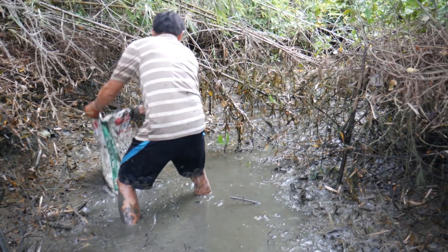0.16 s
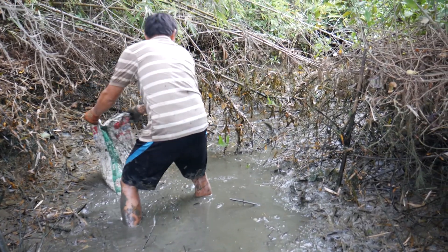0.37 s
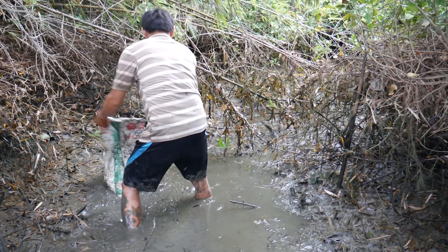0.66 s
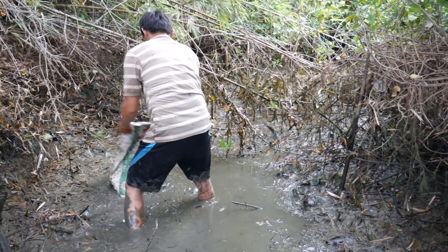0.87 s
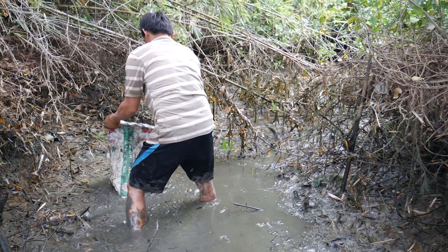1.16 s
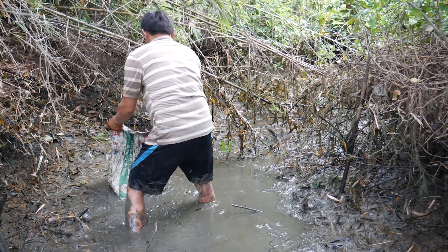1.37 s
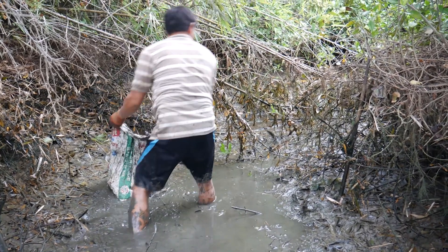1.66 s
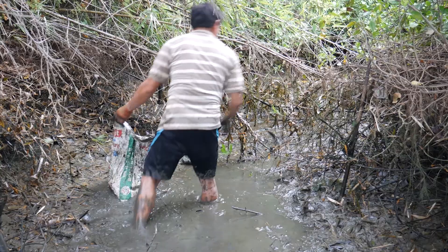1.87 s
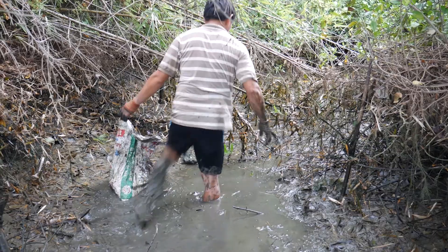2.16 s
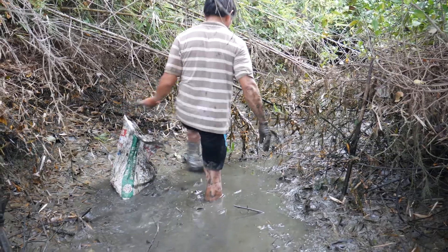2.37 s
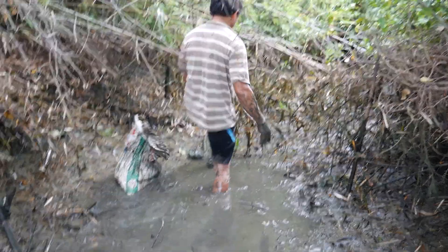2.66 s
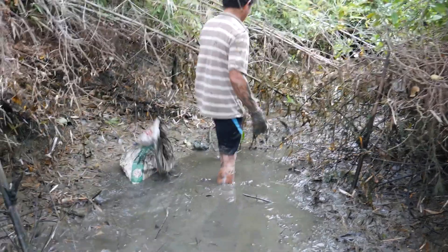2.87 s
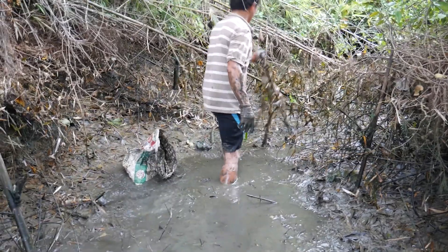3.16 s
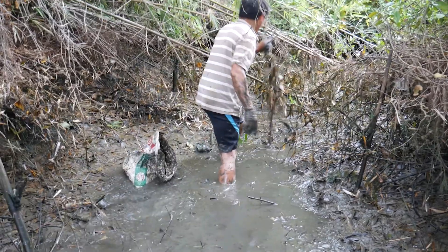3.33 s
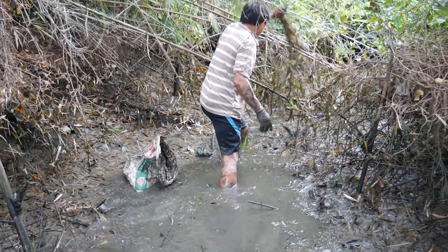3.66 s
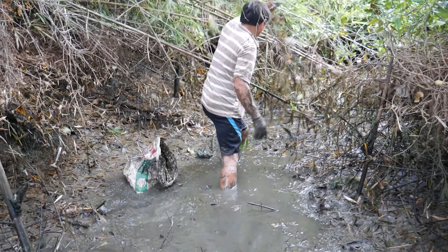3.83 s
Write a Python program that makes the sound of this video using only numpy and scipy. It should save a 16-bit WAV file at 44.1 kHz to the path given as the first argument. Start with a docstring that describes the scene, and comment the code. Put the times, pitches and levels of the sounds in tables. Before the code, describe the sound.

Muddy sloshing and splashing with dull sack knocks and constant small drips, later bubbling steps and loud dry twig cracks, in a leafy ditch with crickets and distant engine hum, heard in stereo from nearby.

```python
"""A man in a muddy ditch shakes a woven sack, sets it down, wades and snaps dry twigs in the thicket.
From the start: shaped noise for air, insects and rustle, sines for a distant engine and paired chirps.
At once twigs snap (noise cracks with echoes), the sack's load knocks (ringing tones) and mud splashes
(grainy noise). Drips plop throughout (short gliding sines) and other insects sing in narrow noise bands.
From 1.4 s bigger bubbles join, from 2.7 s a frog; the loudest snaps come near 3 and 3.7 s."""
import sys
import numpy as np
from scipy import signal
from scipy.fft import rfft, irfft, next_fast_len
from scipy.io import wavfile
from scipy.ndimage import map_coordinates

SR = 44100
rng = np.random.default_rng(int(sys.argv[2]) if len(sys.argv) > 2 else 0)


def wav_out(sig):
    """Save sig, one row per channel (or a flat mono array), as 16-bit PCM at SR to the path in sys.argv[1]."""
    wavfile.write(sys.argv[1], SR, np.round(np.clip(np.atleast_2d(sig).T, -1, 1) * 32767).astype(np.int16))


N = 176400  # samples: four seconds
T = np.arange(N) / SR

# How much he moves, before each sound's own trim: (time [s], rustle level [dB], low slosh level [dB])
MOTION = [(0, -64.5, -81), (.05, -54.5, -44), (.11, -45.5, -45), (.17, -55.5, -41), (.36, -58.5, -47.5),
          (.44, -62.5, -50), (.62, -66.5, -59.5), (.86, -77, -50.5), (1.08, -59.5, -45.5),
          (1.14, -66.5, -47), (1.45, -63, -51), (1.56, -72, -56), (2.0, -69, -60), (2.22, -62.5, -59.5),
          (2.44, -66.5, -63.5), (2.8, -67.5, -55.5), (2.88, -62, -48), (3.1, -62, -56), (3.6, -60.5, -57),
          (3.85, -58, -56.5)]
# How alike left and right are for near sounds: (frequency [Hz], correlation [-1 to 1])
NEAR_LIKENESS = [(60, 1), (380, 0.54), (8000, 0.91), (15000, 0.42)]
# The same for far sounds: (frequency [Hz], correlation [-1 to 1])
FAR_LIKENESS = [(60, 0.067), (15000, 0.89)]


def amp(db):
    """Turn decibels into a plain multiplier."""
    return 10 ** (np.asarray(db) / 20)


def unit(x):
    """Scale a sound to an average (rms) strength of 1."""
    return x / np.sqrt(np.mean(x ** 2) + 1e-20)


def along(points, hz):
    """Read a (Hz, value) curve at any frequency, with straight lines on a log axis."""
    f, v = np.transpose(points)
    return np.interp(np.log(hz + 1), np.log(f + 1), v)


def curves(rows):
    """Draw each column after the time as a curve with one value per sample."""
    s, *columns = np.transpose(rows)
    return [np.interp(T, s, column) for column in columns]


def wobble(rate):
    """A smooth random curve with `rate` random points per second."""
    points = rng.standard_normal(int(N * rate / SR) + 4)
    return map_coordinates(points, [T * rate])


def filtered(x, response):
    """Make each frequency stronger or weaker, as the response says."""
    m = next_fast_len(x.shape[-1] + 4096)
    spectrum = rfft(x, m) * response(np.fft.rfftfreq(m, 1 / SR))
    return irfft(spectrum, m)[..., :x.shape[-1]]


def rush(gain, likeness, size=N, grit_db=0.):
    """Stereo noise of rms 1; quick random level changes (grit) make it grainy."""
    points = rng.standard_normal(size // 30 + 4)
    grit = amp(grit_db * map_coordinates(points, [np.arange(size) / 30], order=1))

    def middle_and_side(hz):
        # The more side there is beside the middle, the less alike the two ears are.
        turn = np.arccos(np.clip(along(likeness, hz), -1, 1)) / 2
        return gain(hz) * [np.cos(turn), np.sin(turn)]

    mid, side = filtered(grit * rng.standard_normal((2, size)), middle_and_side)
    return unit(np.array([mid + side, mid - side]))


def add(out, s, x):
    """Mix x in at time s."""
    at = max(round(s * SR), 0)
    out[..., at:at + x.shape[-1]] += x[..., :N - at]


def plops(rows):
    """Bubbles ring as gliding sines with a soft start and a dying end."""
    out = np.zeros(N)
    for s, db, hz, rise, length in rows:
        u = np.arange(int(1.7 * length * SR)) / (length * SR)  # time in bubble lengths
        phase = 2 * np.pi * hz * length * (u + (rise - 1) * u * u / 2)
        envelope = 4.6 * u * np.exp(-3 * u ** 1.4)
        add(out, s, amp(db) * np.sin(phase) * envelope)
    return out


def background():
    """Shaped noise for air and a swelling far insect chorus; two sines tied to one engine's turning."""
    # Colour of the air noise: (frequency [Hz], level [dB])
    air_colour = [(15, -59), (25, -13), (105, -5.5), (161, -6), (1330, -35.5), (2990, -17.5), (3340, -28.5),
                  (4870, -17.5), (7710, -29), (8830, -53), (14800, -70)]
    # Colour of the far insects: (frequency [Hz], level [dB])
    chorus_colour = [(7850, -73), (8000, -1.5), (9000, 5.5), (10600, -15), (12000, -76)]
    air = amp(-54.5) * rush(lambda f: amp(along(air_colour, f)), FAR_LIKENESS)

    chorus_db = -60 + 4.5 * T / T[-1]
    chorus = amp(chorus_db) * rush(lambda f: amp(along(chorus_colour, f)), FAR_LIKENESS)

    second_hz = 106 - 4.5 * T / T[-1] + 0.34 * wobble(5.58)  # twice the turning rate, slowly sagging
    turn = np.pi * np.cumsum(second_hz) / SR
    second = amp(-53.5 + 1.5 * wobble(7)) * np.sin(2 * turn)
    third = amp(-54.5 + 2.5 * wobble(9)) * np.sin(3 * turn)
    return air + chorus + second + third


def sack():
    """Sack and mud slosh as noise through broad resonances; the load knocks as two dying tones."""
    # Resonances, before a slight sharpening: (centre [Hz], width [Hz], level [dB])
    resonances = [(257, 93, -1), (640, 62, -7), (1170, 92, -20)]
    # Knocks of the load, before a 10 dB lift: (time [s], level [dB], pitch [Hz])
    knocks = [(0.062, -32, 231), (0.161, -27, 298), (0.203, -29, 292), (0.242, -30, 219), (0.288, -37, 275),
              (0.743, -35, 279.5), (0.968, -34.5, 320), (1.054, -28.5, 318), (1.092, -27, 261),
              (1.166, -35, 248), (1.193, -26, 288), (1.265, -23, 267), (1.459, -35.5, 240),
              (2.175, -38, 327), (2.201, -44, 370), (2.488, -35, 245)]
    ring_t60_s, attack_s = 0.039, 0.0063
    upper_ratio, upper_db = 2.137, -7  # typical second tone, beside the first

    def body(f):
        parts = [amp(db) * w * f / np.abs(c * c - f * f + 1j * f * w) for c, w, db in resonances]
        return sum(parts) ** 1.15

    slosh_db = curves(MOTION)[1] - 3 + 3.5 * wobble(45)
    out = amp(slosh_db) * rush(body, NEAR_LIKENESS)
    t = T[:SR // 8]
    for s, db, hz in knocks:
        size, detune = rng.standard_normal(2)
        upper_hz = hz * (upper_ratio + 0.096 * detune)
        upper = amp(upper_db + 2 * size) * np.sin(2 * np.pi * upper_hz * t)
        ring = np.sin(2 * np.pi * hz * t) + upper
        # The strength jumps at random every 60 samples, which roughens the knock.
        steps = rng.standard_normal(len(t) // 60 + 1).repeat(60)[:len(t)]
        ring = ring * (1 + .35 * steps)
        envelope = amp(db + 10 - 60 * t / ring_t60_s) * (1 - np.exp(-(t / attack_s) ** 2))
        add(out, s, envelope * ring * np.ones((2, 1)))
    return out


def water(count=300):
    """Grainy noise rustles with the motion; drips and bubbles plop as sines with a little echo."""
    # Rustle of sack, leaves and water: (frequency [Hz], level [dB])
    rustle_colour = [(290, -66), (500, 4.5), (773, -7.5), (1530, -3), (10200, -4), (14700, -20),
                     (16000, -32)]
    # Big bubbles: (time [s], level [dB], start pitch [Hz], pitch ratio after one length, length [s])
    bubbles = [(1.403, -42, 1340, 1.37, 0.015), (1.429, -39, 890, 1.55, 0.0065),
               (1.478, -35, 1850, 1.35, 0.0049), (2.05, -46, 1740, 1.14, 0.02),
               (2.097, -48, 1035, 1.52, 0.021), (2.127, -37.5, 1950, 1.14, 0.0031),
               (2.143, -43, 1750, 1.02, 0.011), (2.365, -36, 3870, 1.3, 0.0028),
               (2.503, -39.5, 1810, 0.97, 0.0081), (2.65, -32.5, 610, 0.97, 0.012),
               (2.878, -39, 2300, 1.23, 0.0076), (2.975, -38, 502, 1.56, 0.03),
               (3.074, -36.5, 1980, 1.38, 0.0073), (3.097, -39.5, 588, 2.04, 0.0193),
               (3.249, -40, 934, 1.76, 0.015), (3.266, -37.5, 538, 1.38, 0.018),
               (3.272, -31, 934, 1.73, 0.021), (3.521, -35, 586, 1.26, 0.0057),
               (3.557, -35, 2430, 1.18, 0.0053)]
    level_db = curves(MOTION)[0]
    rustle = rush(lambda f: amp(along(rustle_colour, f)), NEAR_LIKENESS, grit_db=4.5)
    rustle = amp(level_db + 11 + 3 * wobble(30)) * rustle

    # Small drips fall at random times, and within limits they get louder with the motion.
    when, size, pitch, glide = rng.random((count, 4)).T
    drip_hz = 3000 * np.exp(2.1 * (pitch - .5))
    motion_db = np.clip(level_db[(when * N).astype(int)], -67, -57)
    drip_db = 20.5 + motion_db - 3 * np.log(size + .03)
    drip_s = 2.5 / drip_hz  # 2.5 cycles of the start pitch
    drips = np.transpose([when * T[-1], drip_db, drip_hz, 1 + 0.21 * glide, drip_s])
    plop = plops(bubbles) + plops(drips)

    t = T[:SR // 10]
    tail = rng.standard_normal((2, len(t))) * amp(-60 * t / 0.074)  # echo fades 60 dB in 0.074 s
    tail = tail / np.linalg.norm(tail[0])
    echo = amp(-1) * signal.fftconvolve(plop[None], tail, axes=1)[:, :N]
    return rustle + plop * amp([[.8], [-.8]]) + echo  # plops lean slightly left


def cricket():
    """Paired chirps of a high sine: a held note, then a weaker pulsing trill; the pitch sags late."""
    first_s, every_s, pair_s = .005, .2375, .052
    pitch_hz, held_s, sag = 7110, 0.024, 0.015
    out, t = np.zeros((2, N)), T[:int(pair_s * SR)]
    held = np.sin(np.pi * np.clip(t / held_s, 0, 1)) ** 0.41

    after = t - held_s
    pulses = np.abs(np.sin(np.pi * after * 130))  # 130 pulses per second
    trill = (t > held_s) * amp(-4 - 83 * after) * pulses

    bend = 1 - sag * np.clip(t / held_s - .6, 0, .7)
    phase = 2 * np.pi * pitch_hz * np.cumsum(bend) / SR
    chirp = (held + trill) * np.sin(phase)
    for s in np.arange(first_s, T[-1], every_s):
        for lag in (0, pair_s):
            level_db = -53 - 6 * (s > 3) + rng.normal(0, 1.5, (2, 1))  # fainter after 3 s
            add(out, s + lag, amp(level_db) * chirp)
    return out


def snaps():
    """Each twig breaks with a very short noise crack, followed by the thicket's fading noise echo."""
    # Snaps, before a 9.5 dB cut: (time [s], level [dB], tilt [dB/octave], echo's 60 dB fade [s])
    breaks = [(0.0189, -19, 1.4, 0.1), (0.29, -23, -4, 0.2), (0.969, -20.5, -4, 0.045),
              (1.066, -19, -3, 0.14), (2.228, -28.5, 2, 0.051), (2.25, -27, 1, 0.036),
              (2.632, -26, -1.5, .03), (2.651, -22.5, -2.5, 0.014), (2.9719, -10.5, 2, 0.24),
              (3.13, -23.5, 6.5, 0.15), (3.6561, 1.5, 3.5, 0.23), (3.7906, -20.5, 7.5, 0.84)]
    # Colour of a twig before the tilt: (frequency [Hz], level [dB])
    twig_colour = [(88, -60), (150, -0.5), (561, -1.5), (1360, -8), (2550, -4), (8310, -8), (14700, -19.5),
                   (16500, -60)]
    crack_t60_s, echo_db, echo_low_hz = 0.018, -9, 1610
    out, t = np.zeros((2, N)), T[:SR // 3]
    for s, db, tilt, echo_t60 in breaks:
        def colour(f):
            return amp(along(twig_colour, f) + tilt * np.log2((f + 50) / 5000))

        def echo_colour(f):
            return colour(f) * f / np.hypot(f, echo_low_hz)  # the echo has less bass

        crack = rush(colour, NEAR_LIKENESS, size=len(t)) * amp(-60 * t / crack_t60_s)
        echo = rush(echo_colour, NEAR_LIKENESS, size=len(t)) * amp(echo_db - 60 * t / echo_t60)
        add(out, s, amp(db - 9.5) * (crack + echo))
    return out


def splashes():
    """Disturbed water gives grainy noise bursts around a centre pitch, with a quick start and fade."""
    # Bursts, before a 7 dB cut: (time [s], level [dB], centre [Hz])
    bursts = [(0.063, -23, 5700), (0.088, -17.5, 1480), (0.1, -13.5, 2920), (1.057, -27, 2670),
              (1.094, -28, 1480), (1.194, -33, 900), (1.252, -28, 1130), (2.49, -30.5, 4170),
              (2.509, -27, 3060), (2.644, -21, 2100), (3.52, -27.5, 1900), (3.834, -25.5, 7370),
              (3.851, -24, 6740), (3.927, -32, 6800)]
    octaves, skirt_db, fade_t60_s, attack_s = 1.24, -16.5, 0.1, .002
    out, t = np.zeros((2, N)), T[:SR // 4]
    for s, db, hz in bursts:
        def colour(f):
            hump = np.exp(-(np.log2((f + 1) / hz) / octaves) ** 2)
            limits = (f > 300) / (1 + (f / 12000) ** 6)  # no bass, soft top
            return (hump + amp(skirt_db)) * limits

        envelope = amp(db - 7 - 60 * t / fade_t60_s) * (1 - np.exp(-t / attack_s))
        add(out, s, envelope * rush(colour, NEAR_LIKENESS, size=len(t), grit_db=5))
    return out


def singers():
    """Other insects and a frog: narrow noise bands that come and go, some gliding in pitch."""
    # Each singer: (pitch [Hz], half-width [Hz], rise over a song [Hz]),
    # then its songs: (start [s], length [s], level [dB])
    voices = [ ((4670, 135, 170), [(.3, 0.16, -55), (1.31, 0.39, -55), (2.46, 0.36, -53.5)]), ((1428, 5, 0),
              [(2.71, 0.11, -59), (3.34, 0.14, -65), (3.55, 0.21, -57.5), (3.82, 0.12, -58)])]
    songs = [song + voice for voice, rows in voices for song in rows]
    # A lower insect sings even phrases, each sinking in pitch.
    phrase_s = .167
    for s in np.arange(.32, 2.3, phrase_s):
        songs.append((s, phrase_s, -57.5, 3080, 166, -169.6))

    out, waver = np.zeros((2, N)), amp(2.5 * wobble(12))
    for s, length, db, hz, width, rise in songs:
        t = T[:int(length * SR)]
        edge = np.clip(np.minimum(t, length - t) / .03, 0, 1)  # 0.03 s fades
        edge = edge * waver[round(s * SR):][:len(t)]
        noise = rush(lambda f: 1 / (1 + ((f - hz) / width) ** 2), FAR_LIKENESS, size=len(t))
        # The complex form of the noise lets its pitch be shifted smoothly.
        glide = np.exp(1j * np.pi * rise * t * t / length)
        add(out, s, amp(db) * edge * np.real(signal.hilbert(noise) * glide))
    return out


def scene():
    """Add all the sounds together."""
    return background() + sack() + water() + cricket() + snaps() + splashes() + singers()


def record(dry):
    """A small microphone: weak bass below about 70 Hz, nothing from 16650 Hz up."""
    low_cut_hz, top_hz = 70, 16650
    return filtered(dry, lambda hz: (hz < top_hz) * hz ** 2 / (hz ** 2 + low_cut_hz ** 2))


dry = scene()
out = record(dry)
wav_out(out)
```